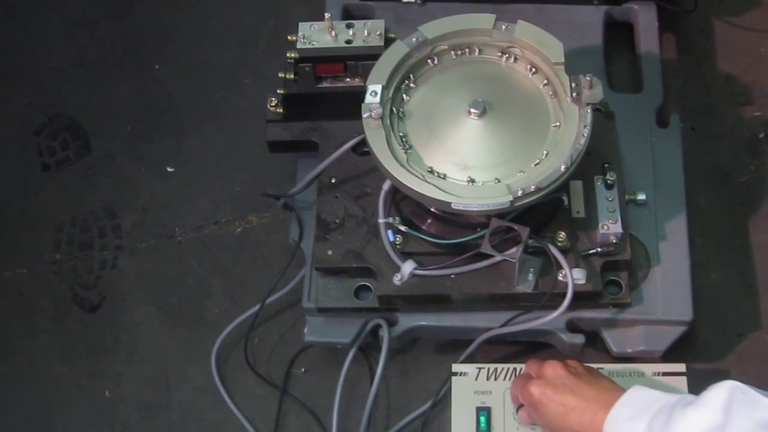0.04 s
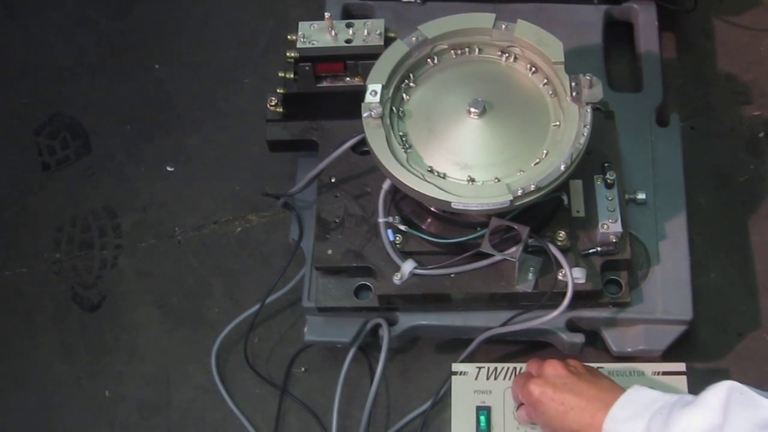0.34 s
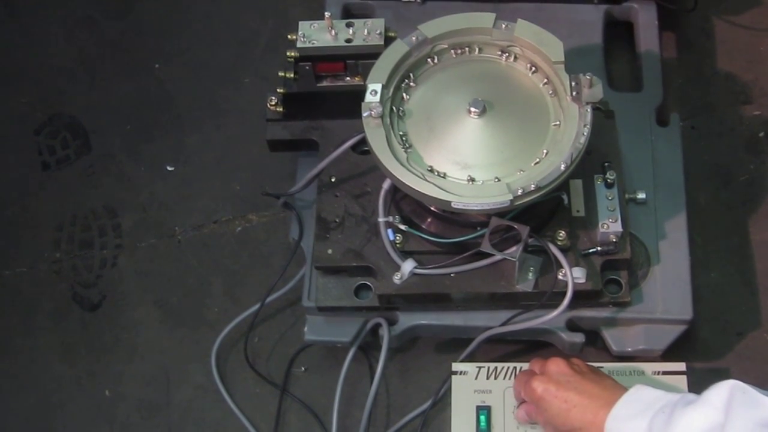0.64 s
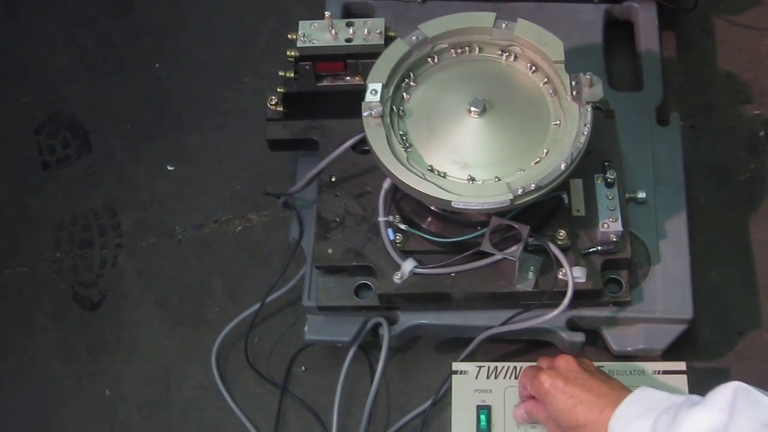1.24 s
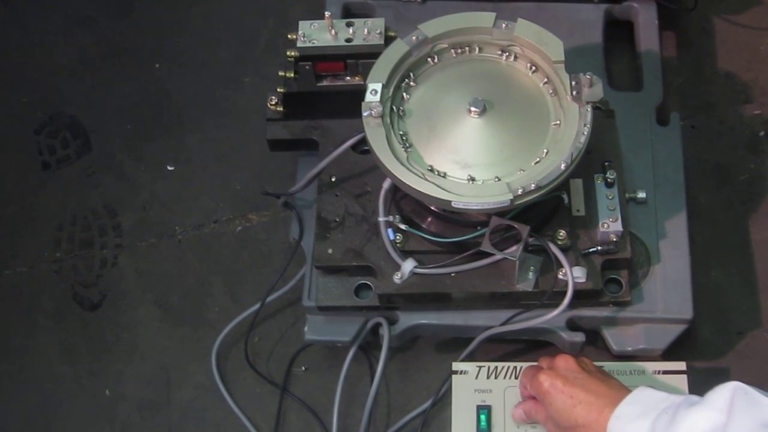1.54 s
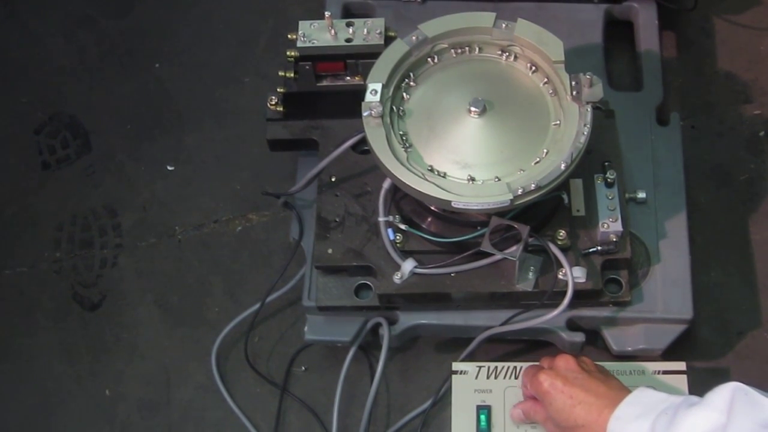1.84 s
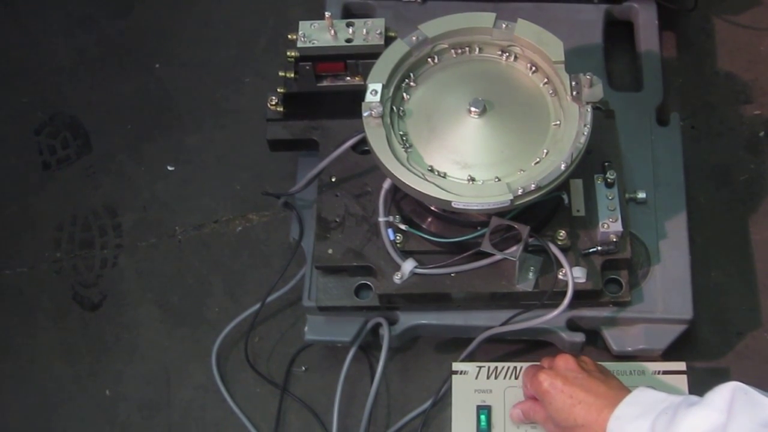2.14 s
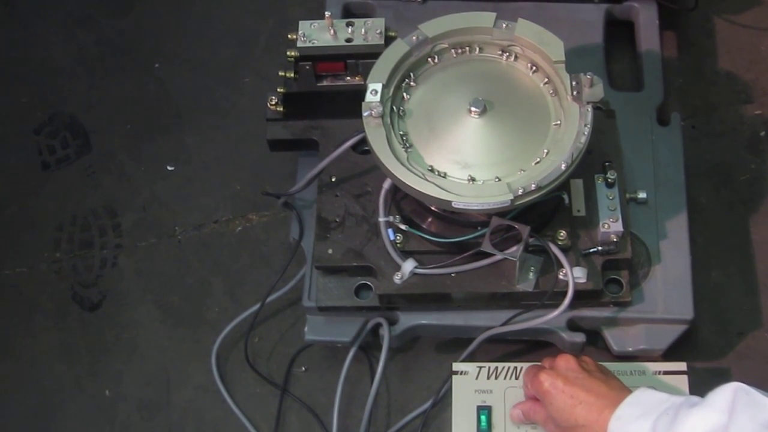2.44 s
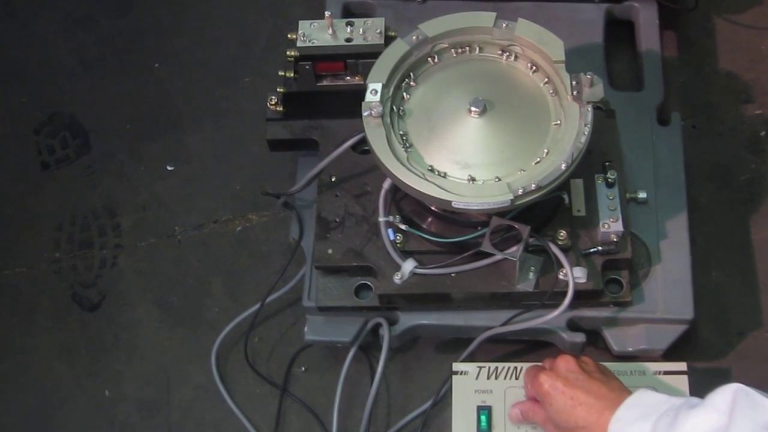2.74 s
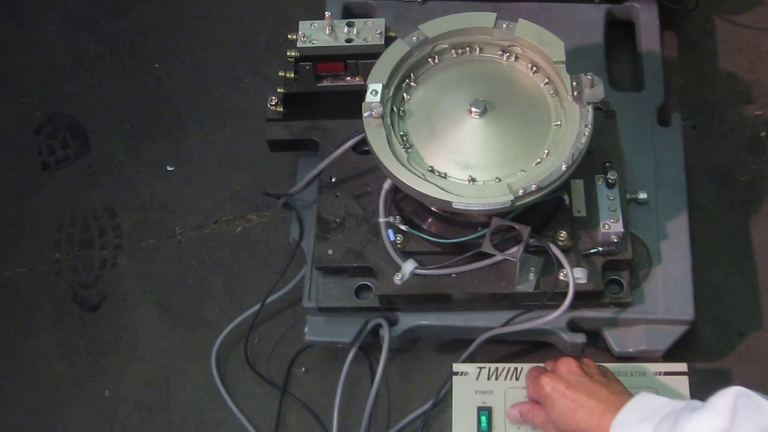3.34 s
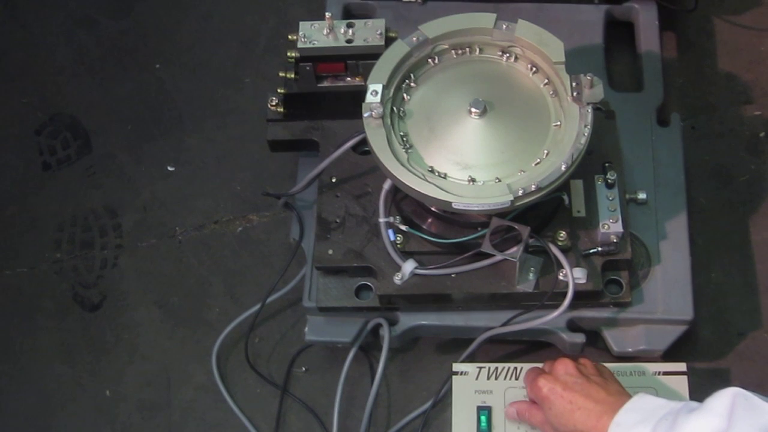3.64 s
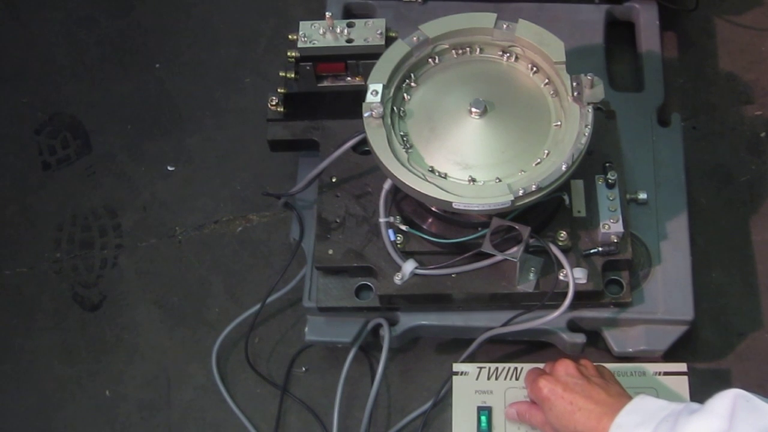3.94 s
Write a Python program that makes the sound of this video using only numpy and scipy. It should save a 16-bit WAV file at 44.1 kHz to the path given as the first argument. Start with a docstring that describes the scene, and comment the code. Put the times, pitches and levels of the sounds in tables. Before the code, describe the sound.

Hum of a vibrating bowl feeder building up over workshop ventilation, with light knocks and clinks.

```python
"""A vibrating bowl feeder is turned up in a workshop and settles into a steady hum. Small metal parts slide and
clink. Once the bowl shakes hard enough, they hop on it and make it ring. A hand knocks and rustles at the
controller, while ventilation, other machines and a faint ring of the bowl's low resonances drone behind."""
import sys
import numpy as np
from scipy import signal
from scipy.fft import rfft, irfft
from scipy.io import wavfile
from scipy.ndimage import uniform_filter1d

SR = 44100
rng = np.random.default_rng(int(sys.argv[2]) if len(sys.argv) > 2 else 0)


def store_pcm(level_fs):
    """Save levels as 16-bit WAV."""
    pcm = np.round(np.clip(level_fs, -1, 1) * 32767).astype(np.int16)
    wavfile.write(sys.argv[1], SR, np.atleast_2d(pcm).T)


N = 176400

DRIVE_HZ = 297.03  # shakes per second
TOP_HZ = 15700  # the treble above this is cut
# how hard the bowl shakes (time [s], level [dB])
BOWL_SWING = [(0, -100), (.7, -77), (.9, -64), (1.36, -52.5), (1.92, -44.5), (2.4, -40.5), (3, -39.6),
              (4, -38.4)]


def undb(db):
    return 10 ** (np.asarray(db) / 20)


def unit(x):
    """Scale to rms 1."""
    return x / np.sqrt(np.mean(x ** 2) + 1e-30)


def pan(db):
    """Left and right gains of constant power."""
    return unit(undb(np.array([[db], [-db]]) / 2))


def curve(rows):
    """A control through (s, value) points."""
    return np.interp(np.arange(N) / SR, *np.array(rows).T)


def bins():
    """Frequency of each spectral bin."""
    return np.maximum(np.arange(N // 2 + 1) * SR / N, 1)


def over_hz(rows):
    """A value per bin through (Hz, value) points."""
    hz, value = np.array(rows).T
    return np.interp(np.log(bins()), np.log(hz), value)


def shape(x, gain):
    """Filter by a frequency response."""
    return irfft(rfft(x) * gain, N)


def mode(hz, width):
    """Response of one resonance."""
    return 1 / (1 + 1j * (bins() / hz - hz / bins()) * hz / width)


def tilt(slope_db):
    """Response that slopes in dB per octave above the bass."""
    return undb(slope_db * np.log2(np.maximum(bins(), 250)))


def noise():
    """Unrelated noise on two sides."""
    return rng.standard_normal((2, N))


def walk(rate):
    """Slow chance with a spread near 1."""
    k = int(SR / rate)
    return unit(uniform_filter1d(uniform_filter1d(np.repeat(rng.standard_normal(N // k + 1), k), k), k)[:N])


def workshop():
    """Ventilation rushes, alike on both sides in the bass, and other machines drone, along with a faint steady
    ring of the bowl's low resonances."""
    # tone colour of the air (frequency [Hz], level [dB])
    air_colour = [(20, -7.5), (45, -3), (130, 1), (250, -1), (500, -3), (700, -5), (1150, -6), (1450, -2.5),
                  (1700, -5), (2000, -2.5), (2200, -10.5), (2800, -8), (3900, -15), (5400, -16),
                  (6500, -21), (8200, -25.5), (9000, -25), (9900, -24.5), (11000, -48), (12500, -37),
                  (16000, -39.5)]
    # how alike the two sides are (frequency [Hz], likeness [0-1])
    side_likeness = [(30, 0.93), (70, 0.74), (130, 0.36), (500, 0.4), (1200, 0.38), (2500, 0), (15000, 0)]
    # where the air sits (frequency [Hz], left minus right [dB])
    air_balance = [(100, -0.5), (700, 0), (1300, 6.5), (2300, 8.5), (3300, 0), (8000, -0.5), (15000, -1)]
    # steady drones: other machines, and near 1580 and 1730 Hz the bowl's own low resonances (pitch [Hz], width
    # [Hz], level [dB], left minus right [dB])
    steady_drones = [(63.8, 5.8, -69.5, 0.5), (772, 9.3, -71, -5.5), (1005.5, 32, -66.5, -5.5),
                     (1580, 7.2, -68.5, -2.5), (1723, 25, -73, 13), (2752, 5, -72.5, -4),
                     (7920, 30, -82.5, 8), (9490, 55, -83.5, -11)]
    alike = np.clip(over_hz(side_likeness), -.98, .98)
    mid, side = shape(noise(), np.sqrt([1 + alike, 1 - alike]) * undb(over_hz(air_colour)))
    lean = undb(np.array([[1], [-1]]) * over_hz(air_balance) / 2)
    air = unit(shape(np.array([mid + side, mid - side]), lean / np.sqrt(np.mean(lean ** 2, axis=0))))
    out = air * undb(-52 + 0.13 * walk(8.52))
    for hz, width, db, side_db in steady_drones:
        drone_colour = mode(hz, width) * mode(hz, 3 * width)
        mid, side = shape(noise(), np.sqrt([1 + alike, 1 - alike]) * drone_colour)
        out = out + undb(db) * pan(side_db) * unit(np.array([mid + side, mid - side]))
    return out


def electrics():
    """Mains hum, thin whines and a low throb that dies away, all wavering slightly."""
    # electrical tones (pitch [Hz], level [dB], left minus right [dB])
    steady_tones = [(100, -74, 0), (120, -69, 0), (9168, -89, -3), (9490, -80, -10)]
    # low throb (time [s], level [dB])
    throb_levels = [(0, -61), (.65, -64), (.85, -59), (1.15, -58), (1.32, -68), (1.8, -69), (4, -78.5)]
    t = np.arange(N) / SR
    tone = lambda hz: np.sqrt(2) * np.sin(2 * np.pi * hz * t + .5 * walk(4.6)) * undb(walk(7.98))
    out = sum(undb(db) * pan(side_db) * tone(hz) for hz, db, side_db in steady_tones)
    return out + undb(curve(throb_levels)) * tone(hz=63.5)


def slide():
    """Sliding parts rub the bowl and stir its low resonances."""
    # rubbing (time [s], level [dB])
    rub_levels = [(0, -67), (1.2, -62.5), (1.4, -57), (1.56, -57), (1.8, -67.5), (2.5, -74.5), (2.7, -59),
                  (2.95, -69), (3.2, -62.5), (3.45, -67), (3.75, -59), (4, -66)]
    # rubbed resonances (pitch [Hz], width [Hz], level [dB])
    rubbed_modes = [(1454, 24, -6), (1584, 30, -3), (1740, 40, 0)]
    body = sum(undb(db) * abs(mode(hz, width)) ** 2 for hz, width, db in rubbed_modes)
    both = noise()
    return undb(curve(rub_levels)) * unit(shape(both + .4 * both[::-1], body))


def sleeve():
    """Cloth brushes by in soft swells of hiss."""
    # strokes (peak time [s], rise [s], fall [s], level [dB], treble tilt [dB per octave])
    sleeve_strokes = [(.01, 0.033, 0.071, -52.5, 3), (.31, 0.043, .03, -51.5, 2),
                      (.45, 0.018, 0.02, -54, 1.5), (.9, 0.031, 0.11, -53.5, -5),
                      (1.111, 0.09, 0.035, -47.5, 2), (1.545, 0.023, .03, -58, 3.5),
                      (1.64, 0.013, 0.032, -53.5, -0.5), (3.7, 0.1, .08, -58.5, 2.5)]
    # tone colour of cloth (frequency [Hz], level [dB])
    cloth_colour = [(100, -20), (250, -2), (470, 7), (750, 0.5), (1800, 3), (3000, -2), (4500, -9),
                    (7000, -16.5), (9800, -25.5), (11000, -42.5), (15000, -37)]
    t, out = np.arange(N) / SR, 0
    for peak, rise, fall, db, tilt_db in sleeve_strokes:
        swell = np.exp(-((t - peak) / np.where(t < peak, rise, fall)) ** 2 / 2)
        stroke_colour = undb(over_hz(cloth_colour)) * tilt(tilt_db)
        out = out + undb(db + 0.79 * walk(90)) * swell * unit(shape(noise(), stroke_colour))
    return out * pan(db=-0.5)


def clinks():
    """Small parts strike each other and ring very briefly."""
    # collisions (time [s], level [dB])
    part_hits = [(0.066, -52), (.1246, -48), (.1984, -49.5), (.2563, -53), (1.8711, -51), (1.9934, -51),
                 (2.1058, -49), (2.2034, -55), (2.2682, -56), (2.354, -52), (2.6277, -52), (2.8938, -47),
                 (3.3283, -51), (3.6561, -51), (3.7364, -52), (3.795, -53)]
    # resonances of a part (pitch [Hz], time to fade by 60 dB [s], level [dB])
    part_modes = [(5750, .014, 0), (6220, 0.011, -7), (6700, 0.0079, -3.5), (7300, .01, -4.5),
                  (8000, .014, -2.5), (8550, .012, -14.5)]
    out, t = np.zeros((2, N)), np.arange(SR // 20) / SR
    soft_start = 1 - np.exp(-t / 0.00031)
    for start, db in part_hits:
        i = int(start * SR)
        for hz, fade_s, mode_db in part_modes:
            detune, left, right = rng.standard_normal((3, 1))
            tone = np.sin(2 * np.pi * (hz * (1 + 0.018 * detune) * t + 0.22 * np.array([left, right])))
            fade = np.exp(-np.log(1000) * t / fade_s)
            out[:, i:i + len(t)] += (undb(db + mode_db) * tone * soft_start * fade)[:, :N - i]
    return out


def knocks():
    """Each knock rings the struck spot and rattles the controller's case, with a short room echo."""
    # light knocks (time [s], level [dB], pitch of the spot [Hz])
    hand_knocks = [(0.216, -50, 1570), (.239, -45, 1624), (.249, -44.5, 1740), (0.299, -48.5, 930),
                   (0.438, -51.5, 1406), (.709, -62, 586), (1.26, -54, 510), (1.628, -56.5, 1300),
                   (2.106, -56, 1570), (2.284, -51.5, 1370), (3.689, -52.5, 512), (3.755, -49, 1576)]
    # resonances of the case (pitch [Hz], width [Hz], level [dB])
    case_modes = [(494, 230, -10.5), (904, 120, -4), (1186, 67, -5.5), (1450, 82, -5), (1800, 220, -5.5),
                  (2720, 900, -7.5)]
    attack_s, rattle_s, echo_s, spot_s = 0.00071, 0.0088, .03, 0.014
    t, out = np.arange(N) / SR, 0
    case = sum(undb(db) / np.sqrt(width) * abs(mode(hz, width)) ** 2 for hz, width, db in case_modes)
    for start, db, hz in hand_knocks:
        age, both = np.maximum(t - start, 0), noise()
        fade = np.exp(-age / rattle_s) + undb(-17.5) * np.exp(-age / echo_s)
        rattle = fade * unit(shape(both + 0.55 * both[::-1], case))
        spot = undb(2.5) * np.sin(2 * np.pi * hz * age) * np.exp(-age / spot_s)
        out = out + undb(db) * (1 - np.exp(-age / attack_s)) * (rattle + spot)
    return out * pan(db=3)


def hum():
    """The shaking bowl gives off clean tones at multiples of its shaking rate."""
    # tones (multiple, level above the swing [dB], left minus right [dB], left's head start [rad])
    hum_tones = [(1, 0, -1.5, -.05), (2, -39.5, 2, 0), (3, -7, -.6, -0.25), (6, -46, -6.5, 0),
                 (8, -40.5, 0, 0), (9, -40.5, 2, 0.6), (10, -43, 2, 1), (18, -40, -5.5, 0.39),
                 (19, -45, -2, .5), (21, -33.5, -12, 0.68), (22, -36.5, -5.5, 0.19), (27, -56, 2, 0)]
    phase, out = 2 * np.pi * DRIVE_HZ * np.arange(N) / SR, 0
    for k, db, side_db, lead in hum_tones:
        out = out + undb(db) * pan(side_db) * np.sin(k * phase + np.array([[lead], [-lead]]) / 2)
    return np.sqrt(2) * out * undb(curve(BOWL_SWING))


def hops(spread, scatter_db, count):
    """Parts land once per shake, with random force and timing (spread is in shakes)."""
    out, cycle = np.zeros(N), np.arange(int(N / SR * DRIVE_HZ))
    for _ in range(count):
        late, force = rng.standard_normal((2, len(cycle)))
        at = (cycle + rng.random() + spread * late) * SR / DRIVE_HZ
        np.add.at(out, np.round(at).astype(int) % N, undb(scatter_db * force))
    return unit(out - out.mean())


def lifted(threshold_db):
    """The share of parts that hop: it rises from 0 to 1 as the swing passes the threshold."""
    return 1 / (1 + np.exp((threshold_db - curve(BOWL_SWING)) / .5))


def chatter():
    """Hopping parts patter and ring the bowl; each side hears a different mix of them."""
    # bowl resonances (pitch [Hz], width [Hz], level [dB], left minus right [dB], starting swing [dB])
    bowl_modes = [(1405, 45, -70.5, 11, -42), (2040, 19, -69.5, 15, -38), (2935, 36, -72, -12, -42),
                  (3120, 100, -76, -6, -38.5), (3390, 24, -73, -12.5, -44), (3663, 94, -68.5, -5, -41),
                  (4034, 58, -69.5, -6, -45), (4226, 25, -67, -6.5, -41), (4316, 60, -67.5, -5, -47),
                  (4650, 18, -71, -6.5, -40), (7290, 110, -77, -7, -43), (9540, 170, -83.5, -7, -44),
                  (15000, 400, -92.5, -2.5, -45)]
    # tone colour of the dry patter (frequency [Hz], level [dB])
    patter_colour = [(500, -16.5), (2000, -12), (3200, 12), (5000, -3), (6200, -2.5), (7600, -12),
                     (10000, -38), (11000, -40), (15000, -17.5)]
    blows = np.array([hops(spread=.2, scatter_db=3.5, count=4) for _ in range(2)])
    blows = blows + 0.14 * blows[::-1]  # each side hears a little of the other
    out = undb(-65) * lifted(threshold_db=-44) * unit(shape(blows, undb(over_hz(patter_colour))))
    for hz, width, db, side_db, start_db in bowl_modes:
        bowl_ring = unit(shape(blows, mode(hz, width) * mode(hz, 5 * width)))
        out = out + undb(db) * pan(side_db) * lifted(start_db) * bowl_ring
    return out


def ring():
    """Parts ring the bowl's track brightly, louder as the swing grows; a caught part buzzes evenly."""
    # a part catches (time [s], length [s], level [dB])
    part_catches = [(2.445, .04, -60), (2.514, .032, -47), (3.65, .035, -59), (3.762, .02, -57)]
    t, swing_db = np.arange(N) / SR, curve(BOWL_SWING)
    track = mode(hz=6223, width=92) * mode(hz=6223, width=1100)
    rung = lambda blows, force: shape(blows * force, track) / np.std(shape(blows, track))
    near, far = (hops(spread=0.086, scatter_db=3, count=2) for _ in range(2))
    force = undb(-60 + swing_db - swing_db.max() + 2 * walk(65)) * lifted(threshold_db=-45.5)
    caught = sum(undb(db) * ((t > start) & (t < start + length)) for start, length, db in part_catches)
    buzz = rung(hops(spread=0.0097, scatter_db=1.5, count=1), uniform_filter1d(caught, size=600))
    return pan(db=-9) * (rung(np.array([near + 0.51 * far, near]), force) + buzz)


def scene():
    """Feeder, hand and room together."""
    return hum() + slide() + chatter() + ring() + clinks() + knocks() + sleeve() + workshop() + electrics()


def record(dry):
    """Cut the highest treble."""
    return signal.sosfilt(signal.ellip(10, .1, 80, TOP_HZ, fs=SR, output="sos"), dry)


dry = scene()
out = record(dry)
store_pcm(out)
```